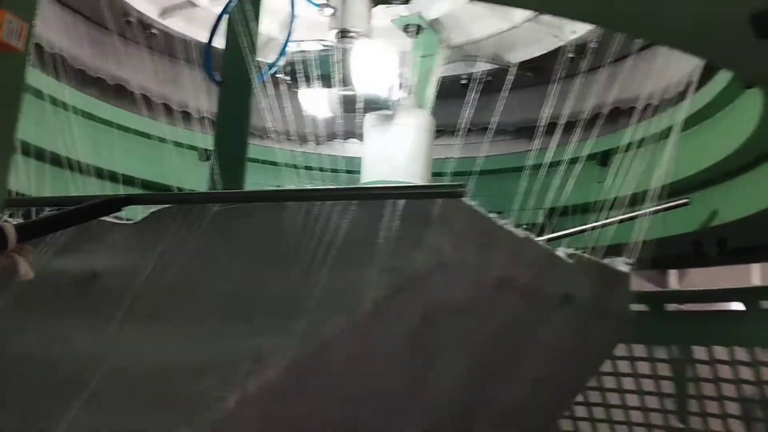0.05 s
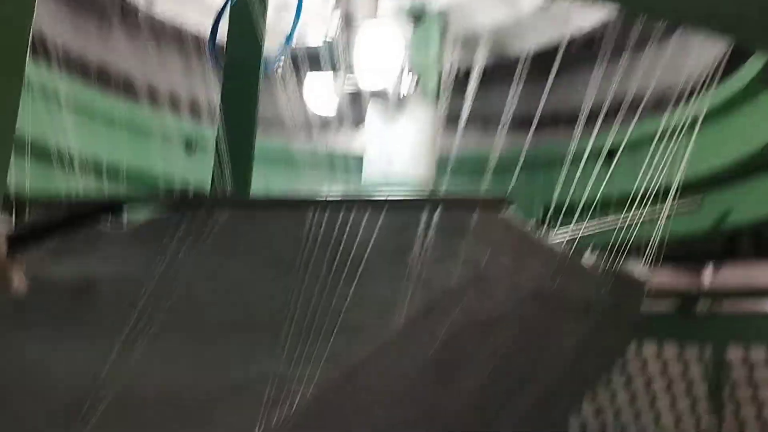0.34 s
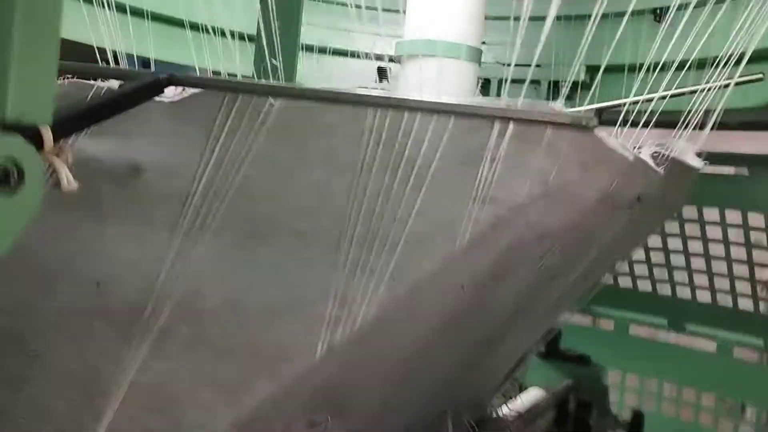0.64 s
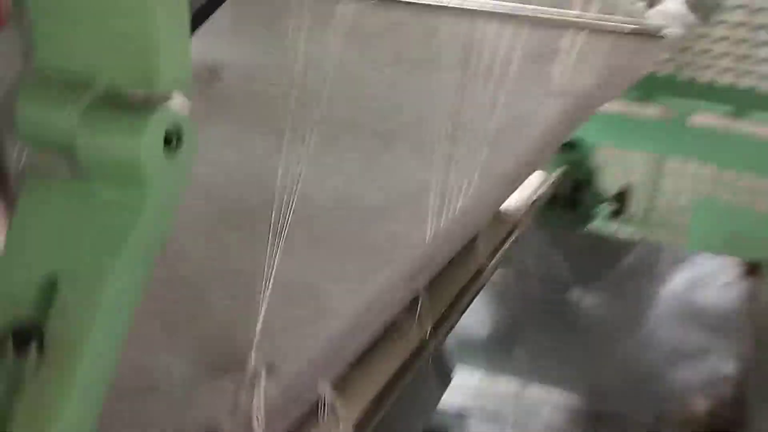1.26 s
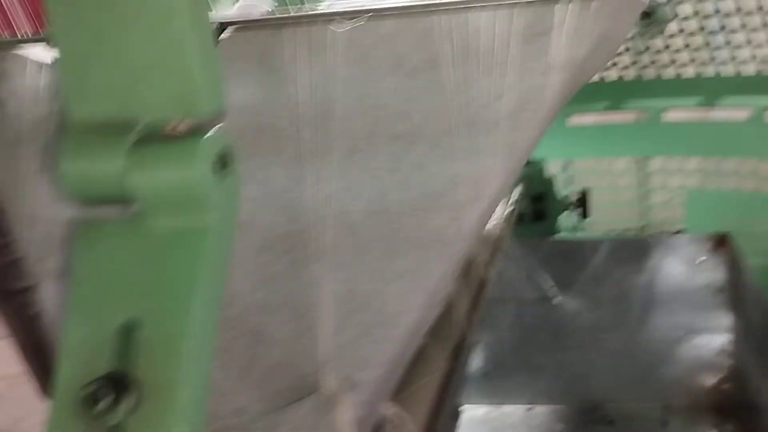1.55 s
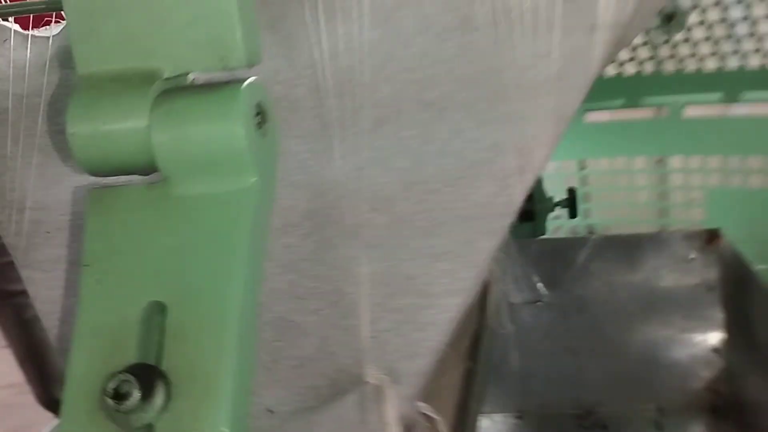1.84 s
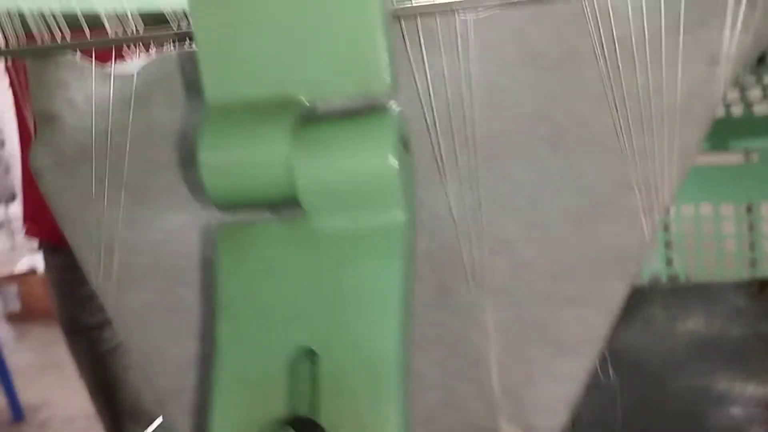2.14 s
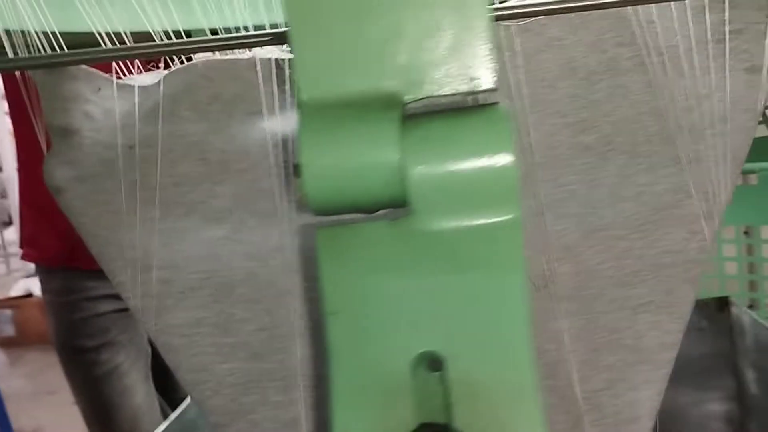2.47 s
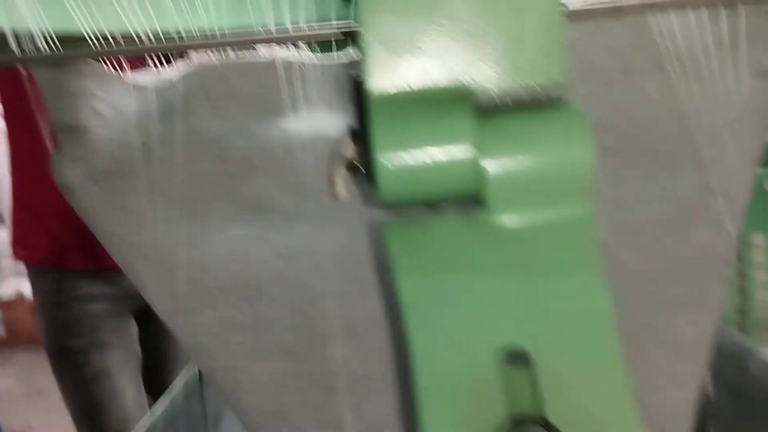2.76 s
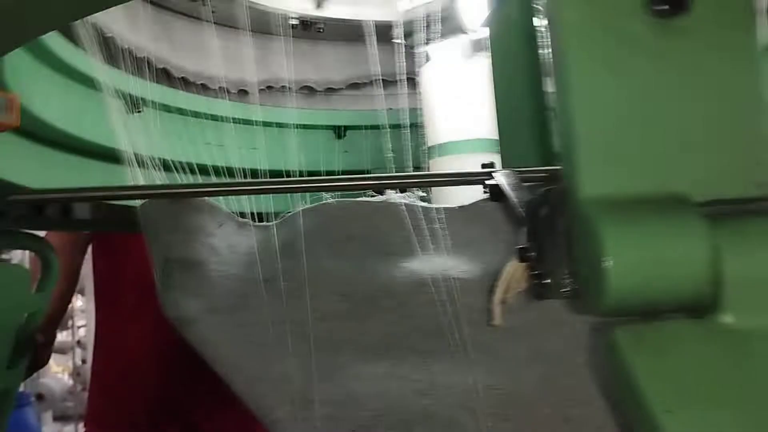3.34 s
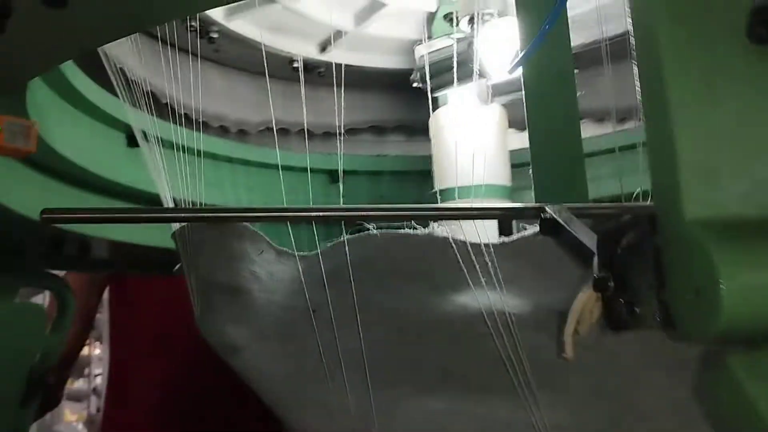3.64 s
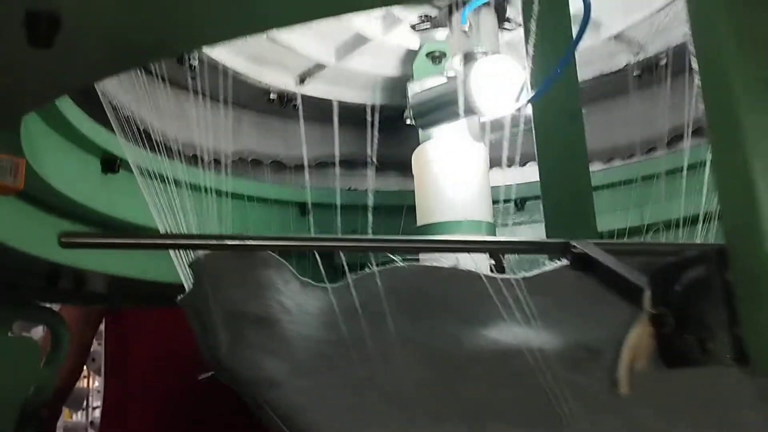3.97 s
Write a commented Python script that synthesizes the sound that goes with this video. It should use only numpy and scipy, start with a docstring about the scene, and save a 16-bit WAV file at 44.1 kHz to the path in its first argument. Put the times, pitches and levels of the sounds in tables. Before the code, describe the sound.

Knitting machines run steadily in a factory hall, a loud pulsing hum under hissing needles and thin wavering tones. The moving microphone catches a brief low rumble, then a quick metal double clink, and the closest hiss fades.

```python
"""Knitting machines in a factory hall

The microphone is carried past one circular knitting machine while others run all around. Loud mains hum
beats against a motor just above it; shafts and gears add thin wavering tones over the frames' drone.
Thousands of needles merge into a hiss, brighter on the right while the nearest ring is in front.
A low rumble swells as the microphone swings, and a loose metal part clinks twice."""
import sys
import numpy as np
from scipy import signal
from scipy.io import wavfile
from scipy.ndimage import uniform_filter1d

SR = 44100
rng = np.random.default_rng(int(sys.argv[2]) if len(sys.argv) > 2 else 0)


def store_pcm(level_fs):
    """Save levels as 16-bit WAV."""
    pcm = np.round(np.clip(level_fs, -1, 1) * 32767).astype(np.int16)
    wavfile.write(sys.argv[1], SR, np.atleast_2d(pcm).T)


N = 176400

WAVER_HZ = 3.027  # fastest waver in the level and speed of the machine tones
# how alike the hall sounds on the two sides of the microphone: frequency_hz, correlation
COHERENCE = [(30, 0.35), (70, 0.6), (160, 0.9), (270, 0.89), (450, 0.65), (740, 0.21), (1200, 0.0099)]


def amp(db):
    """Decibels to gain."""
    return 10 ** (np.asarray(db) / 20)


def unit_rms(x):
    """Scales to rms 1."""
    return x / np.sqrt(np.mean(x ** 2) + 1e-20)


def spectrum(table, hz, column=1):
    """Reads one column of a spectrum on a log-frequency axis."""
    rows = np.array(table, float)
    return np.interp(np.log(hz + 1), np.log(rows[:, 0] + 1), rows[:, column])


def curve(table, t, column=1):
    """Reads one column of a control curve at times t."""
    rows = np.array(table, float)
    return np.interp(t, rows[:, 0], rows[:, column])


def pan(left_db):
    """Stereo gains that put the left side left_db above the right."""
    return amp([[left_db / 2], [-left_db / 2]])


def rolloff_db(ratio, order):
    """A steep filter slope that sets in where the ratio passes 1."""
    return -10 * np.log10(1 + ratio ** order)


def wander(top_hz):
    """A smooth random curve of rms about 1: sines up to top_hz, the slowest strongest."""
    t = np.linspace(0, N / SR, 400)
    rates = top_hz * np.geomspace(1 / 20, 1, 20)
    slow = sum(np.sin(2 * np.pi * (hz * t + rng.random())) / np.sqrt(hz) for hz in rates)
    return np.interp(np.arange(N) / SR, t, unit_rms(slow))


def hall_noise(density_db, size):
    """Stereo noise that follows density_db(t, hz) in dB per Hz, near mono in the upper bass."""
    frames = dict(fs=SR, nperseg=size, noverlap=size - size // 4)
    hz, t, white = signal.stft(rng.standard_normal((2, N)), **frames)
    alike = np.clip(spectrum(COHERENCE, hz), -1, 1)[:, None]
    right = alike * white[0] + np.sqrt(1 - alike ** 2) * white[1]
    shaped = np.array([white[0], right]) * amp(density_db(t[None], hz[:, None]))
    return np.sqrt(SR / 2) * signal.istft(shaped, **frames)[1][:, :N]


def running_time(drift=0.00068):
    """Seconds as kept by a drive whose speed drifts a little."""
    return np.cumsum(1 + drift * wander(WAVER_HZ)) / SR


def machine_tone(hz, db, clock, waver_db=1.4):
    """A wavering tone heard across the hall; high ones differ most between left and right."""
    apart = np.arccos(np.clip(spectrum(COHERENCE, hz), 0, 1))
    shared = wander(WAVER_HZ)
    per_side = np.array([wander(WAVER_HZ), wander(WAVER_HZ)])
    phase_gap = apart * (rng.choice([-1, 1]) * .8 + 0.51 * wander(WAVER_HZ / 2))
    level_db = db + waver_db * (np.cos(apart) * shared + np.sin(apart) * per_side)
    phase = 2 * np.pi * (hz * clock + rng.random()) + phase_gap * np.array([[.5], [-.5]])
    return np.sqrt(2) * amp(level_db) * np.sin(phase)


def chatter_db(t, hz, patch_db=1.08, flicker_db=0.18):
    """Needle strokes bunch at random: small patches of level and a fast flicker across all bands."""
    patches = uniform_filter1d(rng.standard_normal((hz.size, t.size)), size=6, axis=0)
    patches = uniform_filter1d(patches, size=20, axis=1)
    flicker = uniform_filter1d(rng.standard_normal(t.size), size=4)
    return patch_db * unit_rms(patches) + flicker_db * unit_rms(flicker)


def hum(mains_hz=100.04, beat_hz=8.265, in_step_s=0.069):
    """Mains hum and a slightly faster motor beat about eight times a second."""
    # strength of the mains hum: time_s, level_db
    mains_level = [(0, -23.5), (.7, -23.5), (1, -23), (2.1, -21.5), (2.9, -22), (3.3, -23.5), (4, -23.5)]
    # strength of the motor tone: time_s, level_db
    motor_level = [(0, -34), (.9, -29.5), (2.2, -33.5), (3.1, -28.5), (4, -32.5)]
    t = np.arange(N) / SR
    mains_phase = 2 * np.pi * mains_hz * t
    motor_phase = mains_phase + 2 * np.pi * beat_hz * (t - in_step_s)
    mains = amp(curve(mains_level, t)) * np.sin(mains_phase)
    motor = amp(curve(motor_level, t)) * np.sin(motor_phase)
    return np.sqrt(2) * (mains + motor) * pan(left_db=1.26)


def hall_needles(trim_db=0.16):
    """Distant needles all over the hall merge into an even hiss."""
    # the distant hiss: frequency_hz, left_db_per_hz, right_db_per_hz
    hiss = [(600, -72, -69.4), (1000, -71, -71.5), (1350, -75, -70.5), (1650, -73.5, -73.5),
            (2150, -72.7, -73), (2600, -74.0, -73), (3800, -72.5, -72.5), (5300, -73, -69),
            (6900, -77.5, -74), (7680, -81, -78), (8200, -90.5, -82.5), (9200, -77.5, -81),
            (10150, -77, -82), (10970, -79.5, -93), (12140, -72, -82.9), (13300, -70, -81.5),
            (15600, -72.5, -78)]

    def density_db(t, hz):
        sides = np.array([spectrum(hiss, hz, column=1), spectrum(hiss, hz, column=2)])
        return trim_db + sides + rolloff_db(540 / (hz + 1), order=12) + chatter_db(t, hz)
    return hall_noise(density_db, size=512)


def near_needles(treble_hz=8550):
    """The needles of the nearest machine hiss close by and fall away as the microphone turns."""
    # the close hiss at 0 dB gain: frequency_hz, left_db_per_hz, right_db_per_hz
    hiss = [(700, -79.5, -79), (1050, -77, -78), (1340, -77.5, -75), (1580, -77.5, -72), (2300, -75.5, -69),
            (3200, -78.5, -70.5), (4530, -91, -69.5), (5660, -89, -67.5), (6700, -89, -69),
            (8340, -101, -79.5), (9700, -83, -76), (11100, -92, -85), (12500, -84, -77), (15600, -84, -74)]
    # its fall during the turn: time_s, left_gain_db, right_gain_db
    turn = [(0, 1, 0.5), (.6, 1, 1.8), (1, 1.5, 0.5), (1.15, 0.5, -5), (1.6, 0, -5.5), (1.85, -1, -13),
            (2.2, -22, -24), (4, -22, -22)]
    # its top treble on the right: time_s, gain_db
    treble_gain = [(0, -0.5), (.6, -2), (.85, -1), (1.04, 4), (1.15, -4), (1.35, 4), (1.6, 4), (2, 2)]

    def density_db(t, hz):
        treble = curve(treble_gain, t) * (.5 + .5 * np.tanh((hz - treble_hz) / 2000))
        left = spectrum(hiss, hz, column=1) + curve(turn, t, column=1)
        right = spectrum(hiss, hz, column=2) + curve(turn, t, column=2) + treble
        return np.array([left, right]) + rolloff_db(500 / (hz + 1), order=8) + chatter_db(t, hz)
    return hall_noise(density_db, size=512)


def needle_ring():
    """The needles set the metal of the nearest machine ringing in two narrow bands."""
    # resonances of the ring at 0 dB gain: centre_hz, width_hz, peak_db_per_hz, left_over_right_db
    modes = [(1310, 110, -66, 2.5), (2320, 330, -68.5, -6)]
    # strength of each resonance: time_s, lower_gain_db, upper_gain_db
    gains = [(0, 2.5, 1), (.3, -1, -2.5), (.48, -6, -3), (.85, -4, 0), (1.02, -3, -6), (1.15, -18, -21),
             (4, -18, -17)]
    out = 0
    for column, (centre, width, db, left_db) in enumerate(modes, start=1):
        band = hall_noise(lambda t, hz: db + rolloff_db(2 * abs(hz - centre) / width, order=4), 2048)
        out = out + band * pan(left_db) * amp(curve(gains, np.arange(N) / SR, column))
    return out


def frame_drone(split_hz=270):
    """Frames and guards shake in a few broad low resonances; those below split_hz swell and sink."""
    # the drone at 0 dB gain: frequency_hz, level_db_per_hz
    resonances = [(20, -58), (34, -61), (45, -62), (59, -65), (80, -72), (115, -55), (135, -52.5),
                  (160, -58.5), (187, -61), (208, -56.5), (240, -64), (295, -62.5), (330, -55),
                  (355, -55.5), (385, -64.5), (430, -64.5), (500, -68)]
    # swell of its lower part: time_s, gain_db
    low_gain = [(0, -1), (.5, 0.5), (1.15, -4), (1.5, 1), (1.8, -4.5), (2.5, 1), (3.3, 3), (4, 4)]

    def density_db(t, hz):
        swell = curve(low_gain, t) * (.5 - .5 * np.tanh((hz - split_hz) / 30))
        return swell + spectrum(resonances, hz) + rolloff_db(hz / 560, order=12)
    return hall_noise(density_db, size=4096)


def drives(shaft_hz=59.1):
    """The orders of the near shaft move together; the neighbouring drives each keep their own speed."""
    # tones of the near shaft, with the needle rate at order 20: order, level_db
    orders = [(1, -47), (2, -54), (3, -40.5), (8, -47), (12, -55), (20, -57), (40, -59), (60, -55.5),
              (80, -59), (100, -57), (120, -61)]
    # tones of the neighbouring drives: pitch_hz, level_db
    neighbours = [(200.1, -44), (210.5, -46), (216.6, -48.5), (315.7, -57), (324.9, -54.5), (329.9, -51.5),
                  (377.9, -54), (415.8, -46.5), (421, -53), (433.2, -47.5), (459.1, -52.5), (689, -63),
                  (733.2, -63), (1172.4, -59), (1377.4, -60.5), (1419.9, -56), (1837, -59.5)]
    shaft_clock = running_time()
    shaft = sum(machine_tone(shaft_hz * order, db, shaft_clock) for order, db in orders)
    return shaft + sum(machine_tone(hz, db, running_time()) for hz, db in neighbours)


def guard_boom(pitch_hz=354.6, wobble_hz=14, wobble_rad=0.5, rough_db=2.2):
    """One guard resonates at the shaft's sixth order, swelling and fading with an unsteady phase."""
    # swells of the guard: time_s, level_db
    swells = [(0, -39), (.13, -27.5), (.21, -51), (.36, -48), (.5, -31.5), (.62, -38.5), (.77, -32),
              (.88, -41.5), (1.1, -37.5), (1.25, -34.5), (1.43, -31.5), (1.62, -40.5), (2.05, -40),
              (2.33, -54), (2.76, -38), (3.05, -46), (3.3, -35.5), (3.65, -39), (3.95, -34)]
    t = np.arange(N) / SR
    phase = 2 * np.pi * pitch_hz * t + wobble_rad * wander(wobble_hz)
    side_phase = 0.36 * np.array([wander(wobble_hz), wander(wobble_hz)])
    level_db = curve(swells, t) + rough_db * wander(wobble_hz)
    return np.sqrt(2) * amp(level_db) * np.sin(phase + side_phase)


def buffeting():
    """A low rumble swells, mostly on the left, as the microphone swings."""
    # the rumble at 0 dB gain: frequency_hz, level_db_per_hz
    colour = [(15, -54), (28, -45.5), (60, -41), (130, -50), (210, -58.5), (300, -66), (600, -96)]
    # its swell during the swing: time_s, gain_db
    swing = [(0, -22), (.45, -25), (.53, -14), (.66, -9), (.75, 0.5), (.88, 0.5), (.98, -19), (1.27, -12),
             (1.45, -19), (4, -28)]
    rumble = hall_noise(lambda t, hz: spectrum(colour, hz), size=4096)
    return rumble * amp(curve(swing, np.arange(N) / SR)) * pan(left_db=10)


def clinks(rise_s=.002, rattle_db=-2, rattle_t60_s=.1):
    """A loose metal part clinks twice in quick succession: short modes and a bright rattle."""
    # strikes of the part: start_s, level_db
    strikes = [(1.5622, -29.5), (1.5812, -30)]
    # its modes: pitch_hz, gain_db, t60_s
    modes = [(1990, -8, .05), (2670, -4.5, 0.069), (2975, -2, 0.025), (3500, -9, 0.043),
             (4170, -0.5, 0.058), (6350, -6, .04)]
    # colour of its rattle: frequency_hz, relative_db
    colour = [(600, -27), (1800, -7), (3000, 0), (6500, -2), (8500, -15), (16000, -24)]
    rattle = amp(rattle_db) * unit_rms(hall_noise(lambda t, hz: spectrum(colour, hz), size=512))
    out = 0
    for start, db in strikes:
        age = np.clip(np.arange(N) / SR - start, 0, 1)
        fade = -np.log(1000) * age
        clink = rattle * np.exp(fade / rattle_t60_s)
        for hz, mode_db, t60 in modes:
            phase = 2 * np.pi * (hz * age + rng.random()) + rng.normal(0, 0.74, (2, 1))
            clink += np.sqrt(2) * amp(mode_db) * np.exp(fade / t60) * np.sin(phase)
        out = out + amp(db) * np.minimum(age / rise_s, 1) * clink
    return out


def gear_whine(rough_hz=30.04, rough_db=2):
    """Two faint, slightly rough gear tones, close in pitch, come and go together."""
    # the gear tones: pitch_hz, gain_db
    gears = [(918.4, -1.5), (945.8, 2.5)]
    # strength of the pair: time_s, level_db
    swells = [(0, -52.5), (.9, -53.5), (1.35, -61), (1.62, -51), (1.8, -59), (2.3, -56), (2.47, -49.5),
              (2.7, -52), (3.65, -51), (4, -57)]
    level_db = curve(swells, np.arange(N) / SR)
    return sum(machine_tone(hz, db + level_db + rough_db * wander(rough_hz), running_time())
               for hz, db in gears)


def scene():
    """The whole hall as it reaches the microphone."""
    needles = hall_needles() + near_needles() + needle_ring()
    machinery = hum() + drives() + guard_boom() + gear_whine() + frame_drone()
    return machinery + needles + buffeting() + clinks()


def record(dry):
    """The recorder cuts off steeply at the top of the treble."""
    edge_hz = 15820
    band_limit = signal.firwin(1023, edge_hz, window=("kaiser", 9), fs=SR)
    return signal.oaconvolve(dry, band_limit[None], "same", axes=1)


dry = scene()
out = record(dry)
store_pcm(out)
```